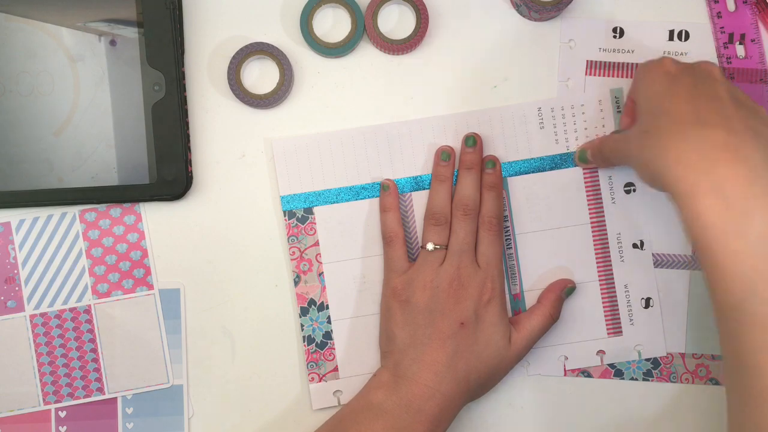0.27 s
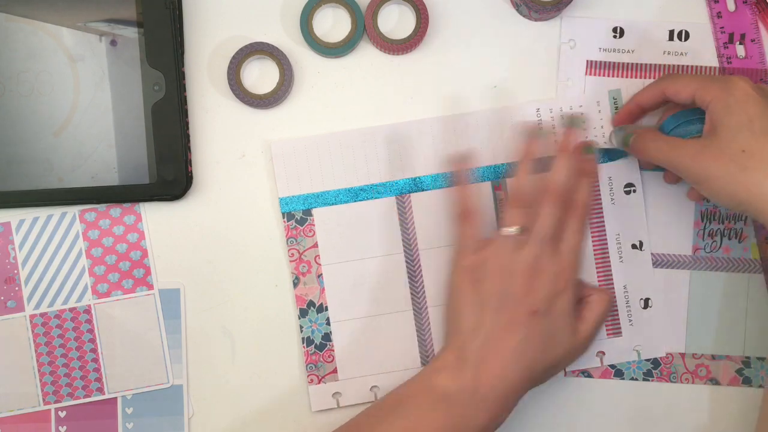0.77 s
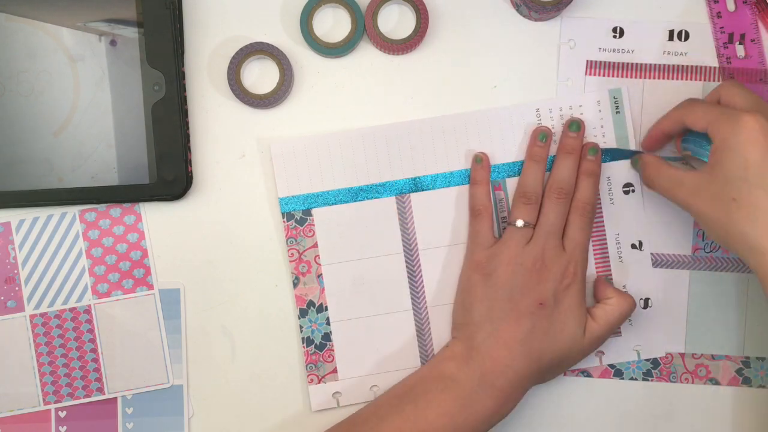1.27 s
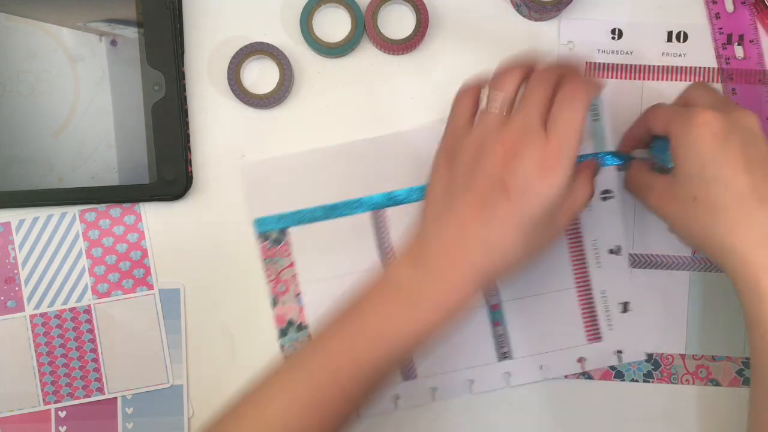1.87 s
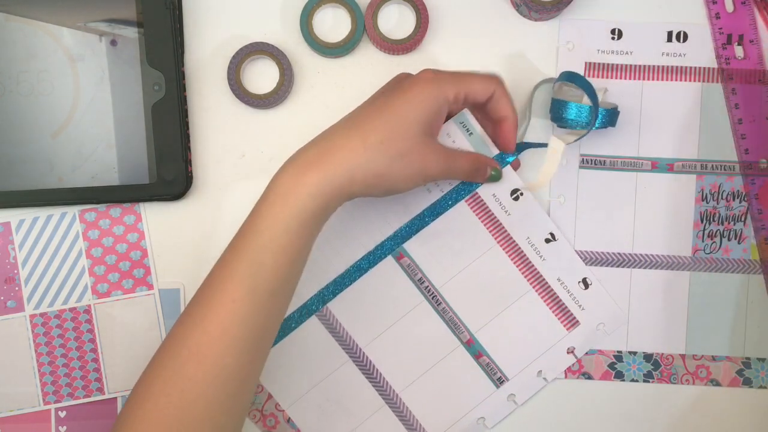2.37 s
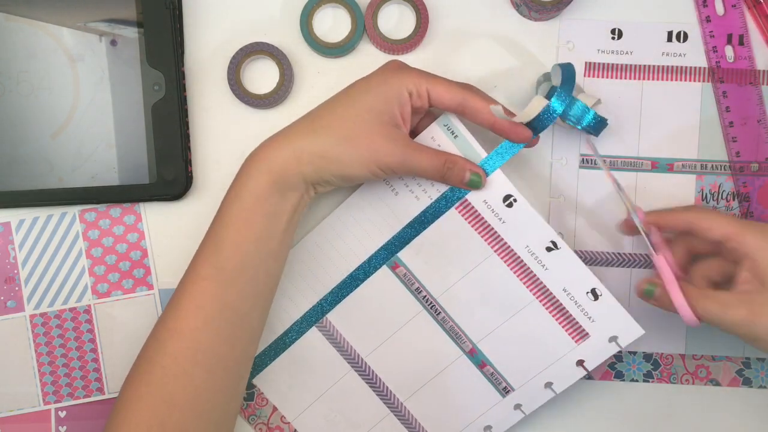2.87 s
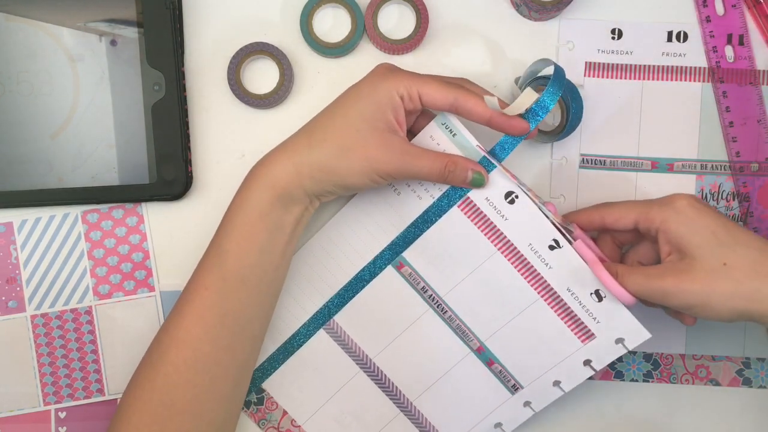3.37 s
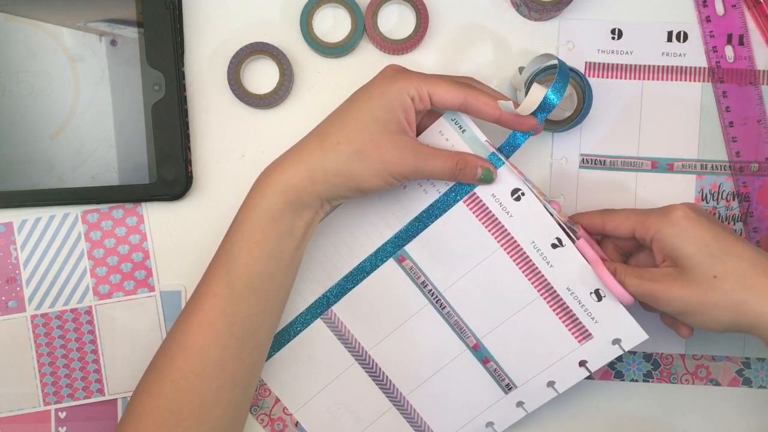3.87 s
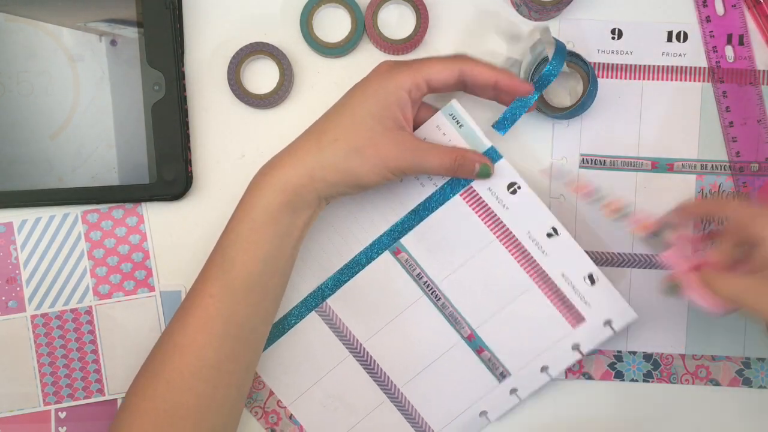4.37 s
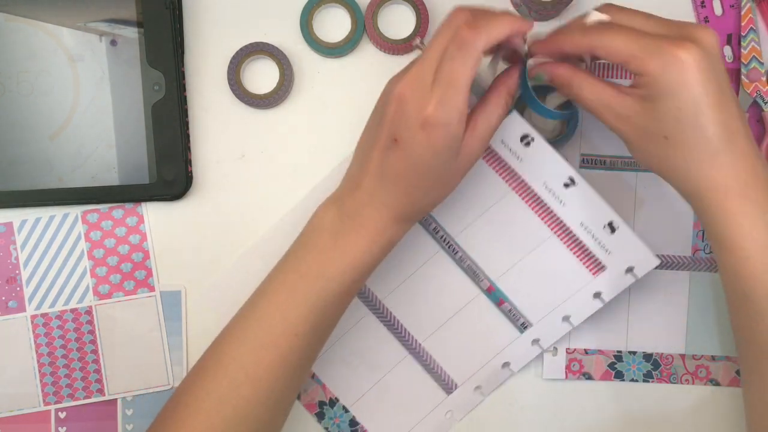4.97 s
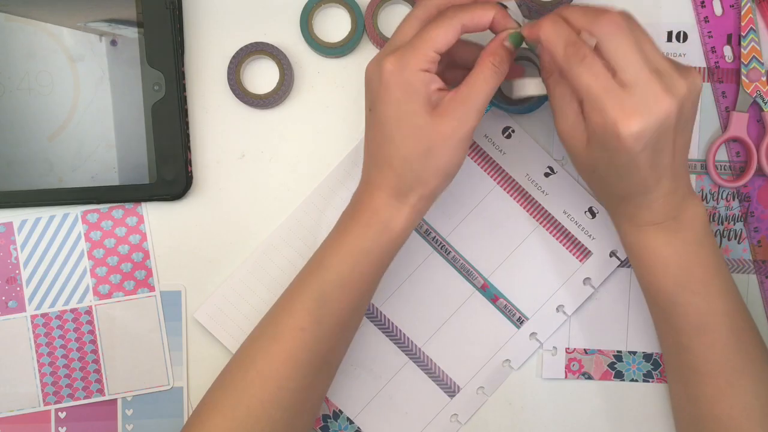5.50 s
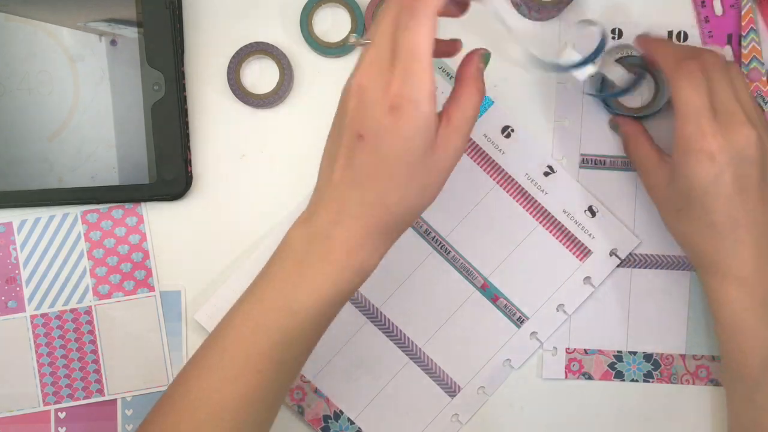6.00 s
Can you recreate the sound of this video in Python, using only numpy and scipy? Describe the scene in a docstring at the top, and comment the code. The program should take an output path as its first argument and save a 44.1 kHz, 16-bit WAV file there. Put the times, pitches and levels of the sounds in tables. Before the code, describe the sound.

A close, dry take of crafting at a desk in a small, quiet room, with a faint low rumble behind. From 0 to 2 seconds fingers softly rub paper, with dull slides, light hisses and tiny tape crackles; a crisp snap with a hollow thump lands at 0.9. Around 2 the page turns with a soft slide and a couple of snaps. From 2.3 to 2.8 scissors are fished up in a quick uneven clatter of steel and plastic, peaking in a hard knock at 2.7. A dull bump comes at 3.0, then quiet handling, a small snap at 3.4 and very faint rasping snips from 3.8 to 4.0. Paper crackles at 4.3 and slides. At 4.6 the scissors land with the loudest, bright clack, with a smaller knock at 4.8. A sharp tick at 4.9 leads into fine picking, crinkles and thin tape swishes, with a soft roll drop at 5.8 and faint rustling to the end.

```python
"""Fingers rub softly over paper and sticky tape crackles: washi tape is laid on a planner page at a desk.
The microphone is close, the room small and quiet. The page is turned, scissors are fished off the desk,
snip the tape and are put down again; then the loose strip is picked at and the roll drops.
Rubs, scrapes and drags are noisy trains of slips, snaps and clacks are filtered bursts, thumps are
gliding low swings, and skates are resonant noise; a short room tail and a low rumble lie behind them."""
import sys
import numpy as np
from scipy import signal
from scipy.fft import rfft, irfft
from scipy.io import wavfile
from scipy.ndimage import uniform_filter1d

SR = 44100
rng = np.random.default_rng(int(sys.argv[2]) if len(sys.argv) > 2 else 0)


def digitize_waveform(pressure):
    """Quantize a signal to 16-bit integers and store it at the path in sys.argv[1].

    Rows of a 2-D input are taken as channels; values are limited to [-1, 1].
    """
    field = np.atleast_2d(pressure).T
    bounded = np.clip(field, -1, 1)
    quanta = np.round(bounded * 32767).astype(np.int16)
    wavfile.write(sys.argv[1], SR, quanta)


N = 275184  # length of the scene in samples

# Colour of the paper sheet: frequency_hz, level_db
PAPER = [(60, -3), (300, 3), (750, 3.5), (1180, 2.5), (1650, -1.5), (3500, -8.5), (6300, -5), (9300, -4),
         (11000, -13), (16000, -13.5)]
# Colour of the scissors' steel: frequency_hz, level_db
STEEL = [(150, -12), (600, 5.5), (1150, 6.5), (1600, 0), (2150, -1), (2600, -4.5), (3800, -2), (4700, -4.5),
         (6300, 0.5), (9500, -6), (11500, -8.5), (16000, -10)]


def rubbing():
    """The sliding page hums, the fingers hiss and creases crinkle, all under the hand's uneven pressure."""
    # The hand slides the page or runs along the tape: start_s, length_s, dull_rub_db, bright_hiss_db
    slides = [(0.189, 0.0566, -64, -63), (0.334, 0.079, -67, -56), (0.539, 0.43, -62.5, -57),
              (0.597, 0.12, -62.5, -49), (1.003, 0.37, -71, -61.5), (1.25, 0.11, -60, -60.5),
              (1.435, 0.058, -62.5, -64.5), (1.805, 0.52, -60.5, -58), (2.003, 0.2, -58.5, -57.5),
              (2.79, 0.12, -57, -65.5), (2.907, 0.19, -65.5, -62), (3.133, 0.15, -60.5, -70.5),
              (3.324, 0.1126, -54.5, -63), (4.035, 0.083, -69.5, -71), (4.262, 0.061, -48.5, -54.5),
              (4.345, 0.65, -59, -62), (4.738, 0.11, -67, -56.5), (5.006, 0.045, -48.5, -52),
              (5.077, 0.11, -63.5, -56), (5.23, 0.042, -56, -55), (5.309, 0.04, -58.5, -57),
              (5.414, 0.19, -63.5, -63.5), (5.605, 0.32, -63.5, -62.5), (5.979, 0.072, -61, -60.5),
              (6.067, 0.28, -68.5, -64)]
    # Dull rub of the sliding page: frequency_hz, level_db
    rub_colour = [(100, -13), (350, -4.5), (780, -5.5), (1020, 1.5), (1220, 5.5), (1600, -6.5),
                  (2300, -4.5), (4000, -25), (9000, -33.5)]
    # Fingertips on paper: frequency_hz, level_db
    hiss_colour = [(500, -24.5), (2100, -16), (4000, 0.5), (6200, -0.5), (9300, -5.5), (10800, -8.5),
                   (16000, -16.5)]
    crinkles_per_s, crinkle_fade_s = 53, 0.001
    crinkle_db, crinkle_spread_db = -7.5, 2.5  # level is relative to the hiss

    rub_gain = pressure_of([(start, length, rub_db) for start, length, rub_db, _ in slides])
    hiss_gain = pressure_of([(start, length, hiss_db) for start, length, _, hiss_db in slides])
    page_slips = friction(N, per_s=640, spread_db=4.5, smooth=0.5)
    fibre_slips = friction(N, per_s=900, spread_db=4.8, smooth=0.45)
    rub = colour(page_slips, rub_colour)[:N] * rub_gain
    hiss = colour(fibre_slips, hiss_colour)[:N] * hiss_gain

    # Tiny creases give way at random moments under the moving hand
    crease_size = amp(crinkle_spread_db * np.minimum(rng.exponential(1, N), 3))
    creases = crease_size * (rng.random(N) < crinkles_per_s / SR)
    crackle = signal.oaconvolve(creases, burst(crinkle_fade_s))
    crinkle = evened(colour(crackle, PAPER, centre_hz=4500, slope_db=3.5)[:N])
    crinkle = amp(crinkle_db) * crinkle * hiss_gain
    return (rub + hiss + crinkle) * waver(rate_hz=64, depth_db=2.5)


def scrapes():
    """Quick strokes: a run of slips that swells fast and eases off, brighter for fine contacts."""
    # Short strokes of skin and tape over paper: start_s, length_s, level_db, centre_hz
    strokes = [(0.261, 0.027, -47.5, 4500), (0.373, 0.08, -61, 239), (0.553, 0.03, -57, 280),
               (0.623, 0.049, -53.5, 4500), (0.708, 0.023, -42, 3900), (1.077, 0.019, -52, 2850),
               (1.741, 0.0329, -56, 7000), (1.817, 0.077, -59, 300), (2.414, 0.016, -41.5, 1300),
               (2.445, 0.0086, -34, 2420), (2.7, 0.026, -33.5, 1292), (3.165, 0.03, -55.5, 2920),
               (3.39, 0.029, -46, 1295), (4.254, 0.024, -39.5, 1300), (4.625, 0.028, -28.5, 3000),
               (5.073, 0.02, -40, 2030), (5.142, 0.012, -39, 2330), (5.652, 0.019, -52, 12020),
               (5.734, 0.045, -52, 9300), (5.863, 0.013, -47.5, 7080), (6.032, 0.014, -52, 6240)]
    out = np.zeros(N)
    for start, length, db, hz in strokes:
        progress = np.arange(SR // 4) / SR / length
        pressure = (1 - np.exp(-progress / 0.13)) * np.exp(-(progress / 1.115) ** 4)
        stroke = friction(len(progress), per_s=1600, spread_db=3.0, smooth=0.28) * pressure
        stroke *= np.sqrt(length * SR) / np.linalg.norm(stroke)  # energy in step with the length
        add(out, start, amp(db) * colour(stroke, PAPER, hz, slope_db=6))
    return out


def snaps():
    """Each snap shakes the sheet for a few milliseconds."""
    # Tape letting go and paper creases snapping: start_s, level_db, centre_hz, fade_s
    snap_list = [(0.262, -41.5, 5260, 0.0034), (0.364, -37, 6030, 0.0011), (0.656, -34, 5000, .0005),
                 (0.6685, -35, 4500, 0.00046), (.906, -24, 3530, 0.0043), (1.128, -39.5, 3880, 0.0046),
                 (1.184, -39.5, 2910, 0.0043), (1.316, -38, 4000, 0.002), (1.362, -44, 3820, 0.0073),
                 (1.456, -39, 7900, 0.0012), (1.571, -47.5, 10000, 0.00122), (1.722, -35.5, 3700, 0.0024),
                 (2.047, -29.5, 1010, 0.0081), (2.155, -28.5, 1520, 0.0015), (3.403, -28, 1700, 0.0028),
                 (4.108, -52, 5960, 0.00515), (4.291, -25, 4224, 0.0027), (4.322, -36, 3000, 0.00265),
                 (4.918, -22, 9200, 0.0013), (5.098, -36, 3500, 0.003), (5.166, -34.5, 3900, 0.00644),
                 (5.194, -35.5, 3000, 0.0026), (5.274, -39, 5440, 0.0037), (5.673, -37, 10000, 0.0017),
                 (5.7978, -29.5, 6000, 0.0013), (5.83, -38, 6960, 0.0013), (5.893, -40.5, 7000, 0.00138)]
    out = np.zeros(N)
    for start, db, hz, fade in snap_list:
        add(out, start, amp(db) * colour(burst(fade), PAPER, hz, slope_db=9.0))
    return out


def clacks(ring_db=-11):
    """Steel and plastic rattle on landing; duller blows ring the desk more."""
    # Roll and scissors knocking on the desk: start_s, level_db, centre_hz, fade_s
    knocks = [(2.363, -31.5, 2160, 0.00155), (2.39, -28, 1000, 0.011), (2.402, -16, 3000, 0.0037),
              (2.4093, -18, 3600, 0.00217), (2.427, -29.5, 1500, 0.00316), (2.4545, -16, 1400, 0.0023),
              (2.4664, -14, 3110, 0.002), (2.487, -23, 1200, 0.0028), (2.5033, -28.5, 2400, 0.00066),
              (2.521, -32, 1200, 0.0024), (2.563, -29.5, 1953, 0.0018), (2.623, -33.5, 990, 0.0076),
              (2.639, -34.5, 2500, 0.0019), (2.658, -30, 2200, 0.0021), (2.721, -6, 2660, 0.0029),
              (2.742, -25, 900, 0.00776), (2.79, -24.5, 1410, 0.003), (3.01, -41, 920, 0.011),
              (4.5916, -14.5, 6400, 0.0031), (4.635, -3.5, 1804, 0.0024), (4.639, -6.5, 5000, 0.0028),
              (4.806, -22, 650, 0.00402), (4.866, -37.5, 600, 0.0025)]
    # Ring of the desk under them: frequency_hz, level_db, t60_s
    desk_modes = [(245, -2, .06), (328, 0, .065), (400, -1, .05), (660, 1, .04), (892, 1.5, .055),
                  (1156, 0.5, .05), (1474, -6, .045), (2150, -5, .035)]
    out = np.zeros(N)
    t = np.arange(SR // 4) / SR
    for start, db, hz, fade in knocks:
        add(out, start, amp(db) * colour(burst(fade), STEEL, hz, slope_db=9.5))
        ring = np.zeros(len(t))
        for mode_hz, level_db, t60 in desk_modes:
            detuned_hz = mode_hz * rng.uniform(0.99, 1.01)
            ring += amp(level_db - 60 * t / t60) * np.sin(2 * np.pi * (detuned_hz * t + rng.random()))
        onset = 1 - np.exp(-t / 0.0013)
        dullness = 1 / np.hypot(1, hz / 3000)
        add(out, start, amp(db + ring_db) * ring * onset * dullness)
    return out


def thumps():
    """Each soft blow gives a hollow knock, then rocks the whole desk, low and a little late."""
    # Hand, roll and scissors landing through the pad of paper, the pitch being that which the glide scales:
    # start_s, knock_db, pitch_hz, fade_s, boom_db
    blows = [(0.365, -38, 332, 0.0079, -47.5), (0.91, -15.5, 335, 0.00234, -27),
             (2.286, -21.5, 350, 0.0057, -30.5), (2.473, -20, 201, 0.003, -30),
             (2.569, -47, 217, 0.0054, -33.5), (2.722, -13, 389, 0.00417, -22.5),
             (2.777, -34, 230, 0.0024, -38.5), (3.012, -19.5, 429.5, 0.0032, -54),
             (4.444, -37, 205.4, 0.007, -55), (4.598, -25, 376, 0.0079, -61.5),
             (4.637, -8, 348, 0.0068, -44.5), (4.805, -28.5, 460, 0.00334, -52),
             (5.802, -31.5, 310, 0.0056, -37)]
    boom_hz, boom_fade_s, boom_lag_s = 110.5, 0.017, 0.0013
    out = np.zeros(N)
    for start, knock_db, hz, fade, boom_db in blows:
        add(out, start, amp(knock_db) * sway(hz, fade, rattle=0.35))
        add(out, start + boom_lag_s, amp(boom_db) * sway(boom_hz, boom_fade_s, rattle=1.0))
    return out


def sway(hz, fade, rattle):
    """A soft push swings the desk top a few times while the loose pages flutter on it."""
    t = np.arange(SR // 4) / SR
    # Starts at 1.23 times hz and slows to 0.55 times as the contact relaxes
    glide_hz = hz * (0.55 + 0.68 * np.exp(-t / (2 * fade)))
    swing = np.sin(2 * np.pi * np.cumsum(glide_hz) / SR)
    band = signal.butter(2, [hz / 4, hz * 1.81], "band", fs=SR, output="sos")
    flutter = evened(signal.sosfilt(band, rng.standard_normal(len(t))))
    swell = t / fade * np.exp(1 - 2 * t / fade)
    return swell * (swing + rattle * flutter)


def drags():
    """Dragged scissors skip over the desk in a quick uneven chatter."""
    # Scissors dragged over the desk: start_s, length_s, level_db
    drag_list = [(2.375, 0.215, -42), (2.622, 0.13, -40)]
    skips = friction(N, per_s=190, spread_db=2.5, smooth=0.1)
    chatter = colour(skips, STEEL, centre_hz=380, slope_db=7.0)
    return chatter[:N] * pressure_of(drag_list)


def snips():
    """Each bite of the closing blades is a soft, short rasp."""
    # Blades biting through the tape in small steps: start_s, level_db
    bites = [(3.823, -51), (3.899, -58), (3.949, -51.5), (3.97, -51), (3.99, -50.5), (4.016, -59)]
    # Colour of the blades: frequency_hz, level_db
    blade_colour = [(1000, -16), (2100, 3.5), (2700, -8.5), (6300, 5), (6900, -10.5), (12000, -18)]
    out = np.zeros(N)
    for start, db in bites:
        add(out, start, amp(db) * colour(burst(fade=0.0073), blade_colour))
    return out


def skates():
    """A paper edge slips so evenly that a few resonances of the sheet stand out, tuned by how it is held."""
    # The page edge skating over the sheet below: start_s, length_s, level_db, pitch_hz
    skate_list = [(1.864, 0.0828, -51, 1384), (2.053, 0.11, -53.5, 1220), (4.45, 0.12, -53, 1383),
                  (5.072, 0.1, -48.5, 1330)]
    # Resonances of the sheet: multiple_of_pitch, level_db
    edge_modes = [(.64, -18.5), (1, 6.5), (1.36, -22), (1.959, -12.5), (2.2, -18), (2.6, -11), (3.2, -40)]
    out = np.zeros(N)
    for start, length, db, hz in skate_list:
        n = int(length * SR)
        sheet = [(hz * multiple, level_db) for multiple, level_db in edge_modes]
        slide = rng.standard_normal(n) * signal.windows.tukey(n, 0.5)
        add(out, start, amp(db) * colour(slide, sheet))
    return out


def swishes():
    """The curled strip crackles finer and brighter than the page."""
    # The loose strip of tape and its backing brushing together: start_s, length_s, level_db
    brushes = [(5.451, 0.0716, -57), (5.605, 0.16, -52.5), (6.123, 0.073, -62)]
    # Colour of the strip: frequency_hz, level_db
    strip_colour = [(1500, -39.5), (4000, -13), (9000, 2.5), (14000, -5.5), (16000, -16)]
    slips = friction(N, per_s=200, spread_db=6, smooth=0.2)
    return colour(slips, strip_colour)[:N] * pressure_of(brushes)


def flex(x, depth_db, size=256):
    """As the sheet bends, its resonances come and go in patches of time and pitch."""
    z = signal.stft(x, SR, nperseg=size)[2]
    patches = uniform_filter1d(rng.standard_normal(z.shape), size=3, axis=0)  # across pitch
    patches = evened(uniform_filter1d(patches, size=12, axis=1))  # across time
    gain = evened(amp(depth_db * patches))
    return signal.istft(z * gain, SR, nperseg=size)[1][:N]


def hollow(x):
    """The desk top gives all that happens on it the same hollow colour."""
    # Where the desk radiates weakly: frequency_hz, width_hz, depth (0 to 1)
    dead_spots = [(510, 150, 0.5), (813, 70, 0.6), (1540, 180, 0.3)]
    for hz, width, depth in dead_spots:
        b, a = signal.iirpeak(hz, hz / width, SR)
        x = x - min(depth, 1) * signal.lfilter(b, a, x)
    return x


def room(x, wet_db):
    """A faint short tail of noise, each band dying at its own speed."""
    # Decay of the small room: frequency_hz, t60_s
    decay = [(400, 0.075), (3000, 0.17), (14000, 0.037)]
    hz, t, z = signal.stft(rng.standard_normal(SR // 2), SR, nperseg=256)
    fading = z * amp(-60 * t / read(decay, hz)[:, None])
    tail = signal.istft(fading, SR, nperseg=256)[1]
    tail *= 1 - np.exp(-(np.arange(len(tail)) / SR / 0.0098) ** 2)  # soft onset after the direct sound
    return x + amp(wet_db) * signal.fftconvolve(x, tail / np.linalg.norm(tail))[:N]


def air(level_db=-61):
    """Low steady rumble of the room with a thin hiss, made of shaped noise."""
    # Colour of the background: frequency_hz, level_db
    air_colour = [(20, -15), (65, -7.5), (120, -7.5), (190, -21.5), (700, -34), (1200, -34.5), (2000, -39),
                  (9000, -42.5), (16000, -51)]
    gain = amp(read(air_colour, np.fft.rfftfreq(N, 1 / SR)))
    spectrum = rfft(rng.standard_normal(N)) * gain
    return amp(level_db) * evened(irfft(spectrum, N))


def friction(n, per_s, spread_db, smooth, count=3):
    """Fibres catch and slip: uneven clicks of varied noise grain over a smooth hiss."""
    size = amp(spread_db * np.minimum(rng.exponential(1, n), 4))
    slips = size * rng.choice([-1, 1], n) * (rng.random(n) < per_s / SR)
    grain = rng.integers(0, count, n)  # which of a few random bursts each click uses
    clicks = sum(signal.oaconvolve(slips * (grain == k), burst(0.0026))[:n] for k in range(count))
    return evened(evened(clicks) + smooth * rng.standard_normal(n))


def burst(fade):
    """A dense rattle of contacts that builds quickly and dies away."""
    t = np.arange(SR // 10) / SR
    contacts = rng.choice([-1, 1], len(t)) * 1.094
    return contacts * np.exp(-(t / fade) ** 0.89) * (1 - np.exp(-t / (0.36 * fade)))


def press(length):
    """Pressure of one movement: attack, gently arched hold, release, then a faint settling of the paper."""
    press_s, press_share = 0.04, 0.064  # long movements start more slowly
    lift_s, settle_db, settle_s = 0.004, -7, 0.073
    arch_db = 1  # how much firmer the middle is than the ends
    t = np.arange(int(length * SR) + SR // 2) / SR
    attack = np.clip(t / (press_s + press_share * length), 0, 1)
    arch = amp(arch_db * (np.sin(np.pi * np.clip(t / length, 0, 1)) - 2 / np.pi))
    after = np.maximum(t - length, 0)
    release = np.maximum(np.exp(-after / lift_s), amp(settle_db) * np.exp(-after / settle_s))
    return attack * arch * release


def pressure_of(moves):
    """Joint gain of movements given as (start_s, length_s, level_db), their powers added."""
    power = np.zeros(N)
    for start, length, db in moves:
        add(power, start, (amp(db) * press(length)) ** 2)
    return np.sqrt(power)


def waver(rate_hz, depth_db):
    """A random gain that takes a new value rate_hz times a second and glides between them."""
    steps = np.arange(N) / SR * rate_hz
    return amp(depth_db * np.interp(steps, np.arange(4096), rng.standard_normal(4096)))


def colour(x, points, centre_hz=None, slope_db=0, size=4096):
    """Causal filter of unit energy: a spectrum, optionally falling away on both sides of a centre."""
    hz = np.fft.rfftfreq(size, 1 / SR)
    db = read(points, hz)
    if centre_hz is not None:
        db = db - slope_db * np.hypot(1, np.log2((hz + 1) / centre_hz))
    log_gain = np.log(amp(np.r_[db, db[-2:0:-1]]))
    # The Hilbert transform of the log gain gives the minimum phase
    taps = np.fft.ifft(np.exp(np.conj(signal.hilbert(log_gain)))).real[:size // 2]
    return signal.fftconvolve(x, taps / np.linalg.norm(taps))


def amp(db):
    """Decibels to gain."""
    return 10 ** (np.asarray(db) / 20)


def evened(x):
    """Scales to rms 1."""
    return x / np.sqrt(np.mean(x ** 2) + 1e-20)


def read(points, hz):
    """Reads a table on a log-frequency axis."""
    f, value = np.transpose(points)
    return np.interp(np.log(hz + 1), np.log(f + 1), value)


def add(mix, start, sound):
    """Mixes a sound in at a start time in seconds."""
    part = mix[max(round(start * SR), 0):][:len(sound)]
    part += sound[:len(part)]


def scene():
    """Everything on the desk, heard in the room."""
    handling = flex(rubbing() + scrapes() + drags(), depth_db=2.8)
    desk = hollow(handling + snaps() + clacks() + thumps() + snips() + skates() + swishes())
    return (room(desk, wet_db=-28.5) + air())[None]


def record(dry):
    """The recorder's band limit: a steep low-pass at 16 kHz."""
    low_pass = signal.firwin(401, 16000, window=("kaiser", 9), fs=SR)
    return signal.oaconvolve(dry, low_pass[None], "same")


dry = scene()
out = record(dry)
digitize_waveform(out)
```